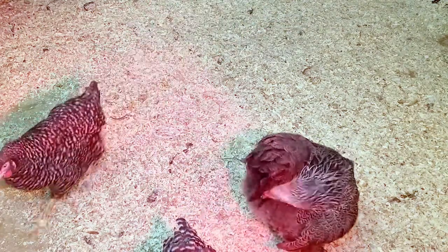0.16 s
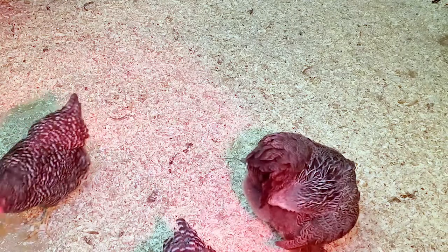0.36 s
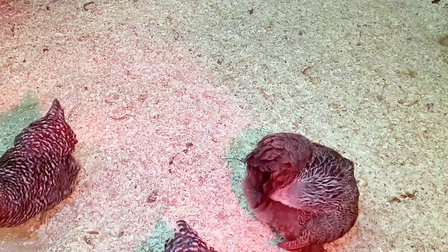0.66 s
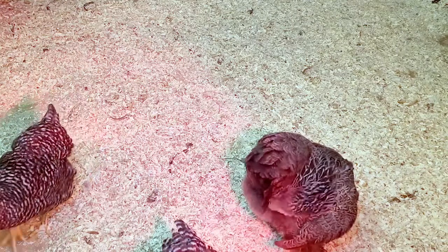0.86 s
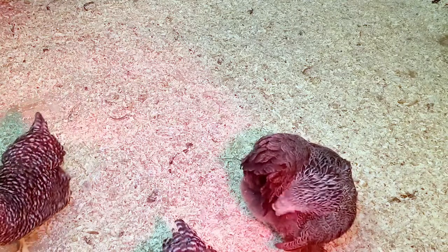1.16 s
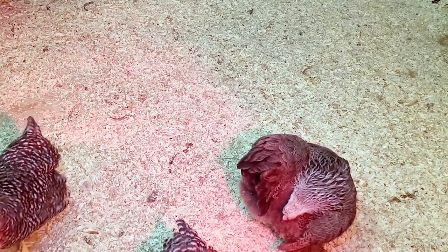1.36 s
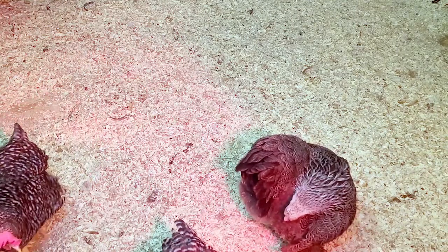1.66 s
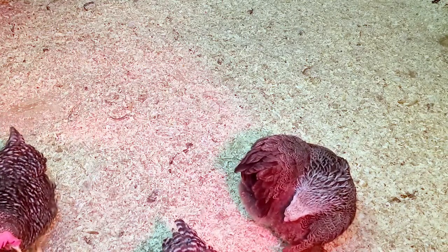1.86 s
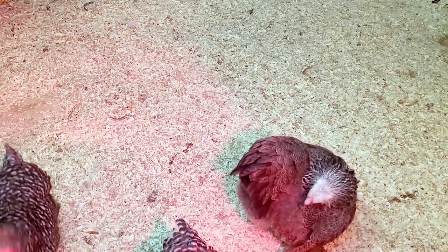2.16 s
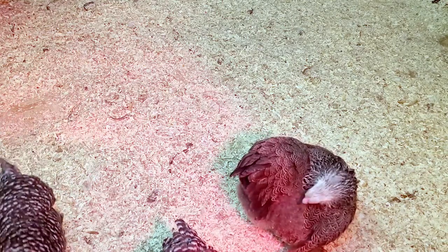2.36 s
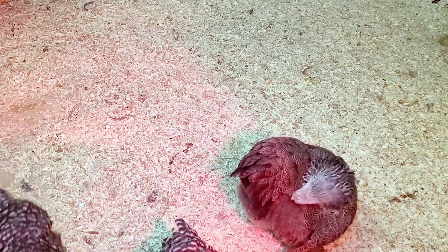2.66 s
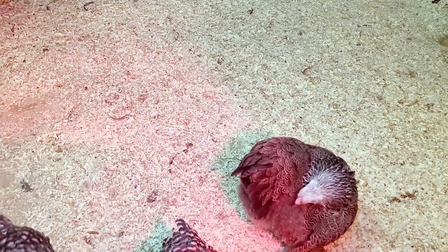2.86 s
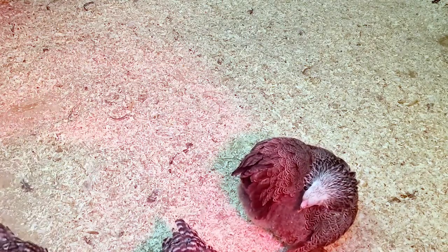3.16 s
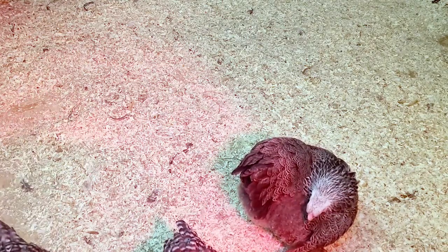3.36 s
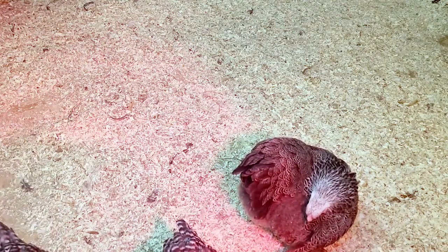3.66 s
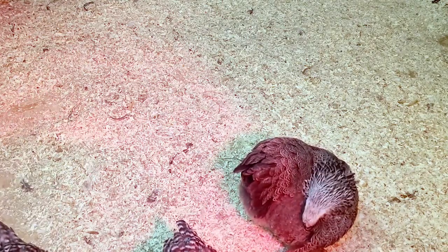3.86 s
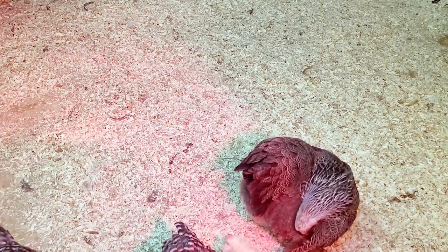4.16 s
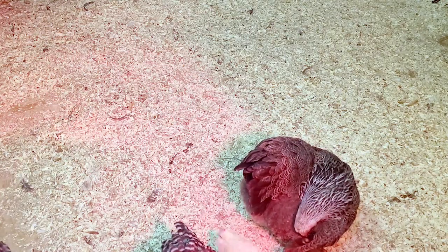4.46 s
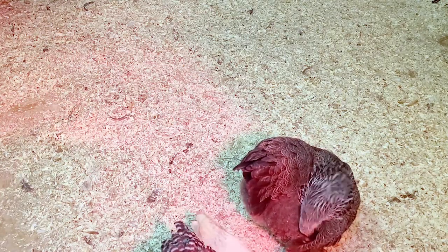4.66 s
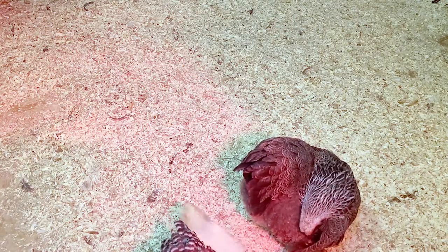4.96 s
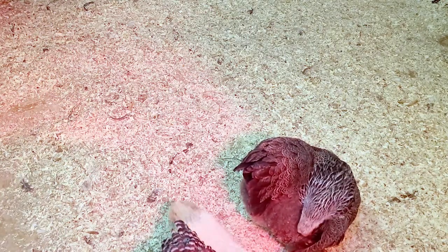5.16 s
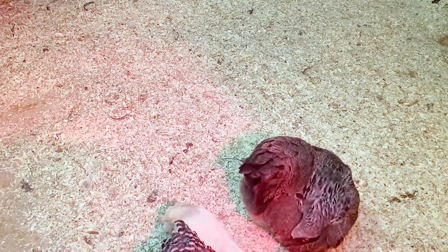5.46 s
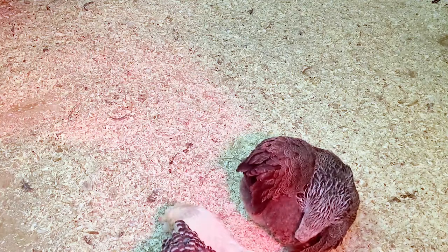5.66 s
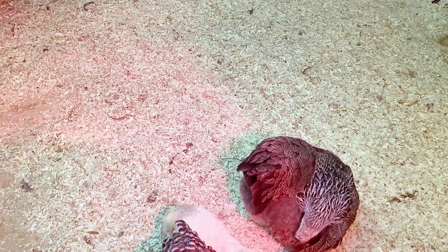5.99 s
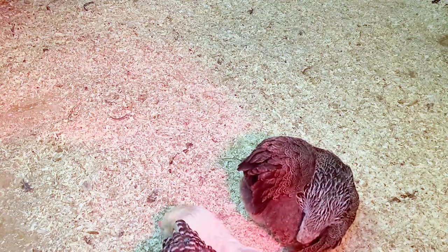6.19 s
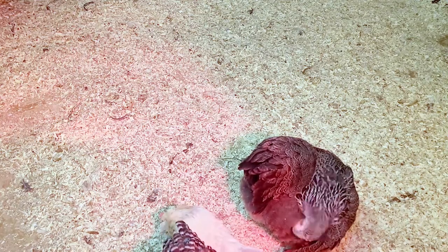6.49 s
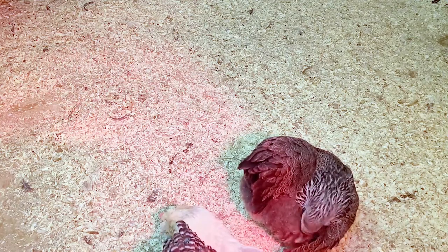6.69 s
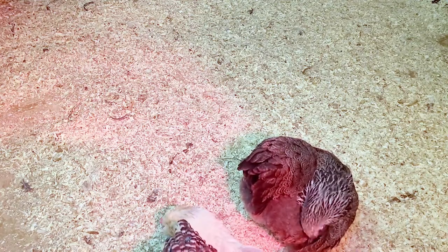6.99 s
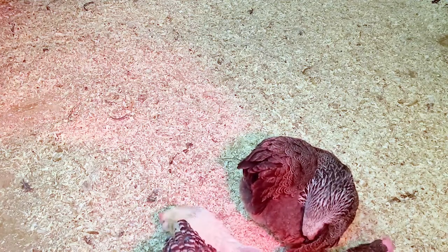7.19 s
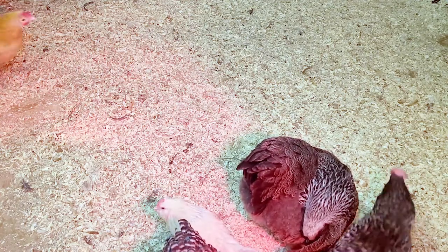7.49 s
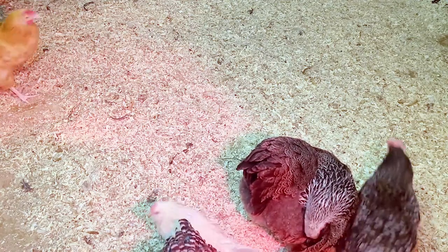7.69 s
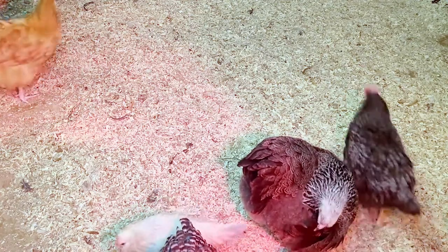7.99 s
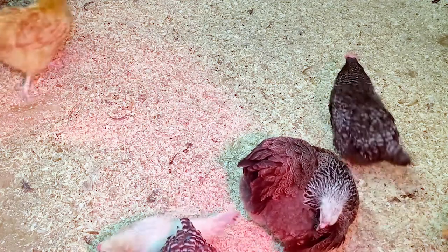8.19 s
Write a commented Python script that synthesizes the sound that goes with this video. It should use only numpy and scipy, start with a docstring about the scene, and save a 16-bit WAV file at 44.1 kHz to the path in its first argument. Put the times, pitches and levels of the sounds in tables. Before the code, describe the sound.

Young chickens cluck, peep and give short raspy squawks in a ringing indoor pen, scratching dry shavings over a low wavering hum.

```python
"""A soft cluck and a raspy squawk come first, over a low wavering hum, a rumble and a faint hiss.
Young chickens potter about on wood shavings in a bare, ringing indoor pen under a heat lamp.
They peep, cluck, squawk, peck, tread and scratch; one kicks the litter four times, close by.
Voices are shaken harmonic tones mixed with air noise; feet and beaks are short bursts of shaped noise.
One hard double tick is a few fading sine waves; the pen adds dense, fading reflections."""
import sys
import numpy as np
from scipy import signal
from scipy.fft import rfft, irfft
from scipy.io import wavfile

SR = 44100
rng = np.random.default_rng(int(sys.argv[2]) if len(sys.argv) > 2 else 0)


def to_wav(sig):
    """Store sig (one row per channel, or 1-D mono) as 16-bit WAV at the path in sys.argv[1].

    Samples outside -1..1 are clipped; the rate is SR.
    """
    pcm = np.clip(np.atleast_2d(sig), -1, 1) * 32767
    pcm = np.round(pcm).astype(np.int16)
    wavfile.write(sys.argv[1], SR, pcm.T)  # frames by channels


N = 367794

# Levels of single sounds in the tables are those before the pen's mix.
# colour of dry shavings sliding on each other: (pitch_hz, level_db)
LITTER = [(250, 0), (600, -31), (1000, -16), (1400, -10.5), (1900, 0), (2400, -1), (3100, 0), (4200, -1.5),
          (6000, 2), (9000, -2), (12000, 6.5), (14000, -1.5), (16000, -15)]
EDGE_HZ = 15900  # top of the whole sound's band


def gain_of(db):
    """Turns decibels into a factor of amplitude."""
    return 10 ** (np.asarray(db) / 20)


def evened(x):
    """Scales a signal to an average (RMS) strength of 1."""
    return x / np.sqrt(np.mean(x ** 2) + 1e-20)


def read(points, hz):
    """Reads a curve of (pitch_hz, value) points, with pitch spaced by ratio as in hearing."""
    point_hz, value = np.transpose(points)
    return np.interp(np.log(hz + 1), np.log(point_hz + 1), value)


def add(mix, start_s, sound):
    """Adds a sound to the mix at its start time, cut off at the end of the mix."""
    part = mix[max(round(start_s * SR), 0):][:len(sound)]
    part += sound[:len(part)]


def over_time(points, t):
    """Reads a curve of (time_s, value) points along straight lines."""
    return np.interp(t, *np.transpose(points))


def coloured(x, spectrum, tilt_db=0):
    """Multiplies x by a spectrum, tilted by so many dB an octave around 3000 Hz."""
    hz = np.fft.rfftfreq(x.shape[-1], 1 / SR)
    octaves = np.log2(np.maximum(hz, 800) / 3000)  # the tilt goes no further below 800 Hz
    return irfft(rfft(x) * gain_of(read(spectrum, hz) + tilt_db * octaves), x.shape[-1])


def wander(count, hz):
    """Smooth chance movement, of average strength 1, mostly slower than the given rate."""
    smoother = signal.butter(2, hz, fs=SR, output="sos")
    noise = rng.standard_normal(count + 2000)  # the first 2000 let the filter settle
    return evened(signal.sosfilt(smoother, noise)[-count:])


def crackle(count, per_s, spread_db):
    """Countless tiny slips of uneven size at chance moments."""
    size = gain_of(spread_db * np.minimum(rng.exponential(1, count), 4))
    return size * rng.standard_normal(count) * (rng.random(count) < per_s / SR)


def paired(two):
    """Blends two unrelated signals into a diffuse field: more alike in the bass than in the treble."""
    # (pitch_hz, left_right_likeness from -1 to 1)
    likeness = [(60, 0.52), (125, 0.9), (250, 0.83), (500, 0.24), (1000, -0.37), (2000, -0.032),
                (16000, 0.072)]
    a, b = rfft(two)
    same = np.clip(read(likeness, np.fft.rfftfreq(two.shape[1], 1 / SR)), -1, 1)
    mid = a * np.sqrt((1 + same) / 2)
    side = b * np.sqrt((1 - same) / 2)
    return irfft(np.array([mid + side, mid - side]), two.shape[1])


def lamp_hum():
    """A low tone whose pitch drifts and whose strength and phase waver by chance."""
    # slow level of the hum: (time_s, level_db)
    hum_level = [(0.0, -43.5), (2.46, -44), (2.49, -38), (2.62, -52), (2.9, -39), (2.97, -56), (3.02, -44),
                 (5.2, -42.5), (5.6, -47), (5.78, -37.5), (6.13, -48), (6.2, -40.5), (6.3, -48),
                 (6.88, -44.5), (8.06, -48.5), (8.15, -36), (8.22, -48), (8.34, -41)]
    base_hz, drift = 58.27, 0.0082  # drift is a share of the pitch
    waver_depth, waver_hz = 0.29, 6.5
    turns = np.cumsum(base_hz * (1 + drift * wander(N, hz=4.5))) / SR
    # the real part changes the strength, the imaginary part mostly the phase
    waver = 1 + waver_depth * (wander(N, waver_hz) + 1j * wander(N, waver_hz))
    tone = evened((waver * np.exp(2j * np.pi * turns)).real)
    return gain_of(over_time(hum_level, np.arange(N) / SR)) * tone


def building_rumble():
    """Steady wide noise, strongest in the deep bass."""
    # colour of the rumble: (pitch_hz, relative level_db_per_hz)
    rumble_colour = [(15, -55), (30, -18), (45, -5.5), (58, -5.5), (70, -0.5), (80, -1.5), (100, -14),
                     (128, -6), (155, -17.5), (250, -19.5), (330, -25.5), (450, -35), (650, -48),
                     (1500, -59)]
    return gain_of(-49.5) * evened(coloured(paired(rng.standard_normal((2, N))), rumble_colour))


def faint_hiss():
    """Steady wide noise, mostly in the middle and treble."""
    # colour of the hiss: (pitch_hz, relative level_db_per_hz)
    hiss_colour = [(300, -52), (600, -12), (1100, -7.5), (2000, -13), (3500, -62), (5500, -18), (8000, -8),
                   (10000, -8), (12000, 5), (14500, -2), (16000, -12)]
    return gain_of(-65.5) * evened(coloured(paired(rng.standard_normal((2, N))), hiss_colour))


def stirring(per_s=900, spread_db=5.0, bright_db=8):
    """Single chips tick here and there under the flock: sparse slips with the litter's colour."""
    # level of the flock's fine rustle: (time_s, level_db)
    rustle_level = [(0, -93), (.55, -70), (.8, -69.5), (1.5, -58.5), (1.7, -77), (2.15, -92), (2.4, -64.5),
                    (3.05, -72.5), (3.5, -68), (4.9, -66), (5.35, -70), (6.6, -67), (7.25, -63), (7.7, -61),
                    (8.1, -68), (8.34, -79)]
    ticks = evened(coloured(crackle(N, per_s, spread_db), LITTER, bright_db))
    return gain_of(over_time(rustle_level, np.arange(N) / SR)) * ticks


def treads(swell_s=0.0041, skirt_db=-17):
    """Soft pushes of a bird's weight on the bedding: fading noise around one pitch."""
    # dull treads and wing pushes: (start_s, fade_s, level_db, centre_hz)
    pushes = [(0.651, 0.011, -51.5, 1010), (0.711, 0.011, -49.5, 350), (0.778, 0.015, -55, 298),
              (1.459, 0.018, -53, 282), (2.85, 0.042, -58.5, 370), (3.62, 0.31, -77, 446),
              (4.115, 0.029, -57, 650), (4.81, 0.038, -58.5, 500), (5.16, 0.075, -57.5, 370),
              (7.389, 0.21, -65, 800), (7.49, 0.11, -59.5, 700), (7.9, 0.032, -58.5, 465)]
    out = np.zeros(N)
    t = np.arange(SR // 2) / SR
    for start_s, fade_s, level_db, hz in pushes:
        hump = [(hz / 8, -50), (hz / 8.5, skirt_db), (hz, 0), (hz * 2.94, skirt_db), (hz * 12, -60)]
        force = np.minimum(t / swell_s, 1) * np.exp(-np.maximum(t - swell_s, 0) / fade_s)
        noise = evened(coloured(rng.standard_normal(len(t)), hump))
        add(out, start_s, gain_of(level_db) * force * noise)
    return out


def chips(count, bright_db):
    """One handful of shavings, with resonances of its own, catching and slipping."""
    hz = np.geomspace(500, 16000, 60)
    own_colour = np.column_stack([hz, read(LITTER, hz) + 3.6 * rng.standard_normal(len(hz))])
    catching = gain_of(4 * wander(count, 70))
    slips = crackle(count, per_s=2800, spread_db=2.5) * catching
    less_bass = [(100, -25), (500, 0), (16000, 0)]
    return coloured(coloured(slips, own_colour, bright_db), less_bass)


def scratches():
    """A claw gathers speed through the shavings, then the chips settle; speed sets the loudness."""
    # feet raking the litter: (start_s, swell_s, fade_s, level_db, brightness_db_per_octave)
    rakes = [(0.63, 0.0019, 0.03, -43.5, 0.5), (.965, 0.011, 0.038, -70, -8),
             (1.054, 0.004, 0.086, -64.5, -1), (1.26, 0.014, 0.66, -69.5, -12),
             (1.439, 0.0078, 0.0097, -55, -6), (1.9, 0.035, 0.035, -60, 2.5),
             (2.179, 0.0053, .05, -68.5, -16.5), (2.304, 0.013, 0.03, -63.5, -13),
             (2.426, 0.015, 0.04, -67, -14), (2.84, 0.014, 0.021, -49, 10),
             (3.077, 0.0043, 0.024, -64.5, -4.5), (3.386, 0.0069, 0.029, -59, -11.5),
             (3.99, 0.018, 0.062, -73, 12), (4.103, .005, 0.068, -53.5, -10.5),
             (4.374, 0.0068, 0.026, -56.5, 11), (4.466, 0.0021, 0.079, -58.5, -10),
             (4.789, 0.0092, 0.4, -63.5, -2), (4.92, 0.012, 0.18, -59, -15), (5.11, 0.047, 0.043, -46, -5),
             (5.393, 0.011, 0.069, -49, -4), (5.434, 0.0058, 0.04, -35.5, -3),
             (5.615, 0.054, 0.036, -31.5, 0), (5.809, 0.0063, 0.037, -32.5, -0.5),
             (6.058, 0.026, 0.049, -36.5, -2.5), (6.098, 0.02, 0.023, -32.5, -0.5),
             (6.318, 0.0057, 0.013, -50.5, -6), (6.399, 0.003, 0.0068, -36.5, 0),
             (6.47, 0.013, 0.037, -46.5, -3), (7.019, 0.0059, 0.061, -61.5, -8),
             (7.371, 0.0017, 0.075, -56.5, -8), (7.482, 0.017, 0.13, -58.5, 2), (7.57, 0.03, 0.27, -54, 24),
             (7.77, 0.046, 0.19, -56.5, 8), (7.939, 0.012, 0.018, -51.5, 4),
             (8.147, 0.0055, 0.031, -64.5, -13.5), (8.171, 0.023, 0.19, -54, 9)]
    out = np.zeros(N)
    t = np.arange(16384) / SR
    for start_s, swell_s, fade_s, level_db, bright_db in rakes:
        gather = np.minimum(t / swell_s, 1) ** 0.69
        settle = np.exp(-(np.maximum(t - swell_s, 0) / fade_s) ** 1.13)
        speed = gather * settle
        rustle = speed * sum(chips(len(t), bright_db) for _ in range(3))
        # a short scratch keeps no more energy than its speed curve holds
        add(out, start_s, gain_of(level_db) * evened(rustle) * np.sqrt(np.mean(speed ** 2)))
    return out


def pecks():
    """Each tap is a snap of litter-coloured noise, fading within a few milliseconds."""
    # beak taps and snapping chips: (start_s, level_db, brightness_db_per_octave)
    taps = [(.638, -39.5, 6), (1.138, -56, 8), (1.474, -51, -1), (2.321, -50, 9), (2.811, -44.5, 25),
            (3.169, -57, 8), (4.106, -46.5, -7), (4.266, -50, 6), (4.938, -53.5, -3), (5.989, -46, -3.5),
            (7.24, -53, 15), (7.778, -44.5, 15), (7.958, -45, 23)]
    out = np.zeros(N)
    t = np.arange(2048) / SR
    for start_s, level_db, bright_db in taps:
        snap = np.exp(-t / .0035)
        noise = evened(coloured(rng.standard_normal(len(t)), LITTER, bright_db))
        add(out, start_s, gain_of(level_db) * snap * noise)
    return out


def hard_peck():
    """A beak hits something hard and rebounds: a double tick that rings briefly and very high."""
    # the two hits: (start_s, level_db)
    hits = [(4.4632, -28), (4.4647, -31.5)]
    # what rings: (pitch_hz, level_db, time_to_fade_60_db_s)
    modes = [(2350, -21, 0.033), (12000, -2.5, .006), (13400, 0, 0.0035), (15010, -3, .006)]
    out = np.zeros(N)
    t = np.arange(2048) / SR
    ring = sum(gain_of(db - 60 * t / t60) * np.sin(2 * np.pi * hz * t) for hz, db, t60 in modes)
    for start_s, level_db in hits:
        add(out, start_s, gain_of(level_db) * ring)
    return out


def syrinx(t, hz, rough, bright_db, half_tones=1.28, overtone_db=-7, slope_db=-4):
    """A high harmonic tone; strain shakes its pitch, makes cycles alternate and lets air through."""
    # a chick's throat and beak: (pitch_hz, level_db)
    throat = [(500, -26), (1000, 4.5), (1400, -2), (1950, -3), (2500, -5.5), (3000, 0), (3400, 2),
              (3700, 1), (4350, 1), (5000, 2), (5600, -1.5), (6400, -4), (7800, 2), (9500, -9), (11700, 1),
              (16000, -23)]
    # hoarse rush of air: (pitch_hz, level_db)
    rasp = [(700, -31), (1200, -16.5), (1600, 2), (2000, 4.5), (2450, 6.5), (3000, -3), (3600, -5.5),
            (4300, -28), (5500, -16), (8000, -8), (12000, -16), (16000, -19)]
    shake = (.028 + .065 * rough) * wander(len(t), 300)
    phase = 2 * np.pi * np.cumsum(hz * (1 + shake)) / SR
    k = np.arange(2, 21)[:, None] / 2  # 1, 1.5, 2 ... 10 times the pitch
    harmonic_db = overtone_db * (k >= 2) + (slope_db + bright_db) * np.log2(k)
    # tones halfway between harmonics make every other cycle differ
    kind = np.where(k % 1 == 0, 1, half_tones * rough / np.sqrt(k))
    weight = kind * gain_of(harmonic_db) * (k * hz < EDGE_HZ)
    buzz = (weight * np.sin(k * phase)).sum(0) / np.sqrt((weight ** 2).sum(0))
    tone = evened(coloured(buzz, throat))
    air = evened(coloured(rng.standard_normal(len(t)), rasp, np.mean(bright_db)))
    air_share = .4 * np.clip(rough, 0, 1)
    rattle = gain_of((1.5 + 3.5 * rough) * wander(len(t), 200))
    return evened(rattle * (np.sqrt(1 - air_share) * tone + np.sqrt(air_share) * air))


def beak(x, hz, lift_db=6.5, half_width=0.078):
    """The open beak lifts one band of the voice; half_width is a share of the band's pitch."""
    offset = (np.fft.rfftfreq(len(x), 1 / SR) / hz - 1) / half_width
    return evened(irfft(rfft(x) * gain_of(lift_db / (1 + offset ** 2)), len(x)))


def peeps():
    """Short, thin glides of the voice with hardly any roughness."""
    # (start_s, length_s, level_db, first_pitch_hz, last_pitch_hz, brightness_db_per_octave)
    glides = [(0.915, 0.11, -73, 3130, 3130, -5), (1.132, 0.033, -68.5, 3160, 3080, -14),
              (1.208, 0.038, -61, 2820, 2390, -5), (1.256, 0.046, -54.5, 2953, 2683, 6.5),
              (1.317, 0.12, -66.5, 2670, 2466, -18), (3.33, 0.055, -69, 2494, 2595, -13),
              (3.399, 0.051, -60.5, 2707, 2950, 6), (3.45, 0.1, -69, 2940, 2756, -21),
              (3.48, 0.11, -73, 2070, 1810, -12), (3.93, 0.0067, -41.5, 3570, 3680, 13.5),
              (3.981, 0.043, -57, 2433, 1966, 1), (3.992, 0.0082, -42, 3830, 4110, 10),
              (4.178, 0.019, -64, 2280, 1960, -4), (6.36, 0.054, -58.5, 3090, 2700, -26),
              (6.405, 0.021, -45.5, 2620, 2370, 5.5), (6.462, 0.043, -53, 2150, 2336, 4),
              (7.067, 0.038, -65, 3090, 3006, -21)]
    out = np.zeros(N)
    for start_s, length_s, level_db, first_hz, last_hz, bright_db in glides:
        t = np.arange(0, length_s, 1 / SR)
        tone = syrinx(t, np.linspace(first_hz, last_hz, len(t)), .05, bright_db)
        add(out, start_s, gain_of(level_db) * tone * signal.windows.tukey(len(t), .7))
    return out


def clucks():
    """A soft note glides up or down; it swells, holds, and dulls as the beak closes."""
    # (start_s, length_s, level_db, first_pitch_hz, last_pitch_hz, roughness 0-1,
    #  brightness_db_per_octave, beak_resonance_hz)
    notes = [(0.0, 0.062, -58, 1342, 1207, 0.65, 2.5, 2600),
             (1.155, 0.11, -58.5, 1326, 1216, 0.42, 1.5, 2540),
             (1.774, 0.073, -57, 1345, 1670, 0.1, 5, 4940),
             (1.84, 0.12, -63.5, 1631, 1728, 0.68, -20, 1830),
             (2.513, .105, -60.5, 1319, 1487, 0.13, -1.5, 2500),
             (3.309, 0.061, -59, 1226, 1257, 0.15, 5.5, 2480),
             (3.879, 0.095, -58.5, 1246, 1098, 0.54, 1.5, 3260),
             (4.046, 0.068, -59.5, 1440, 1306, 0.3, 0, 2680),
             (4.257, 0.034, -52.5, 2006, 2073, 0.14, 2.5, 2200),
             (4.581, 0.047, -52, 1388, 1463, 0.2, 7.5, 1430),
             (4.787, 0.083, -57.5, 1090, 970, 0.5, -3, 2120),
             (5.002, 0.14, -61, 1596, 1490, 0.19, 6.5, 1550),
             (5.611, 0.021, -61.5, 1060, 1016, .5, -10, 1000),
             (5.796, 0.034, -61.5, 1005, 980, 0.54, -10, 1020),
             (6.629, 0.075, -51, 1484, 1574, 0.31, 6.5, 3050),
             (6.846, 0.087, -66, 1495, 1570, 0, 4.5, 1550), (6.949, 0.13, -66.5, 999, 883, 0.66, 1, 1900),
             (7.162, 0.088, -58.5, 1290, 1463, 0.01, 5, 1410),
             (7.554, 0.21, -68.5, 921, 820, 0.37, -11, 840)]
    swell_share, onset_db = 0.21, -1  # part of the length spent swelling; the level it swells from
    dulling_db = 5  # brightness lost from start to end, per octave
    out = np.zeros(N)
    for start_s, length_s, level_db, first_hz, last_hz, rough, bright_db, beak_hz in notes:
        t = np.arange(0, length_s, 1 / SR)
        part = t / length_s
        swell_db = np.interp(part, [0, swell_share], [onset_db, 0])
        hz = first_hz + (last_hz - first_hz) * part
        tone = beak(syrinx(t, hz, rough, bright_db + dulling_db * (.5 - part)), beak_hz)
        add(out, start_s, gain_of(level_db + swell_db) * tone * signal.windows.tukey(len(t), .15))
    return out


def squawks():
    """The pitch leaps up and holds as the level climbs; at the top the voice turns raspier and sinks."""
    # (start_s, rise_s, fall_s, level_db, top_pitch_hz, roughness (about 0-1),
    #  brightness_db_per_octave, beak_resonance_hz)
    calls = [(.075, 0.034, .07, -55, 2072, 1.18, -7.5, 3200), (.358, 0.058, .08, -46, 2010, 0.79, -1, 3030),
             (3.565, 0.041, .07, -43, 1842, 0.54, 2.5, 3530),
             (3.78, 0.029, .06, -51.5, 2008, 0.37, 1.5, 3250),
             (4.605, .045, .08, -45, 1941, 0.7, 4.5, 2970),
             (6.682, .05, .135, -43.5, 2524, 0.24, 2.5, 4900),
             (7.579, 0.027, .085, -60, 2117, 0.77, -9, 2870),
             (7.805, 0.039, .085, -60, 2160, 0.8, -0.5, 3220),
             (8.225, .05, .08, -41.5, 2004, 0.73, 2, 3900)]
    # shares of the roughness: at the start, on reaching pitch, at the top, at the end
    rough_shares = (0.152, .35, .75, 1.25)
    pitch_shares = [.7, 1, 1, .8]  # shares of the top pitch at the same four moments
    dulling_db = 5  # brightness lost from start to end as the beak closes, per octave
    out = np.zeros(N)
    for start_s, rise_s, fall_s, level_db, top_hz, rough, bright_db, beak_hz in calls:
        length_s = rise_s + fall_s
        t = np.arange(0, length_s, 1 / SR)
        stages = [0, rise_s * .5, rise_s, length_s]  # the pitch is up halfway through the rise
        hz = top_hz * np.interp(t, stages, pitch_shares)
        swell_db = np.interp(t, [0, rise_s, length_s], [-14, 0, -11])
        strain = np.clip(rough * np.interp(t, stages, rough_shares), 0, 1)
        tone = beak(syrinx(t, hz, strain, bright_db + dulling_db * (.5 - t / length_s)), beak_hz)
        add(out, start_s, gain_of(level_db + swell_db) * tone * signal.windows.tukey(len(t), .12))
    return out


def pen(x, direct_db, wet_db, left_lag):
    """The straight path may reach one side first; dense reflections from near walls die by band."""
    # how long the pen rings: (pitch_hz, time_to_fade_60_db_s)
    ringing = [(200, 0.75), (800, 0.39), (2000, 0.5), (5500, 0.33), (10000, 0.27), (16000, 0.11)]
    echoes = rng.standard_normal((2, SR)) * (rng.random((2, SR)) < 5000 / SR)  # about 5000 a second
    hz, t, bands = signal.stft(paired(echoes), SR, nperseg=256)
    fade = gain_of(-60 * t / read(ringing, hz)[:, None])
    tail = signal.istft(bands * fade, SR, nperseg=256)[1]
    # silent for 2 ms, then rising to full over the next 2 ms
    tail = tail * np.clip(np.arange(tail.shape[1]) / SR / 0.002 - 1, 0, 1)
    tail = tail / np.linalg.norm(tail, axis=1, keepdims=True)
    wet = signal.fftconvolve(x[None], tail, axes=1)[:, :N]
    direct = np.array([np.roll(x, left_lag), x])  # lag in samples; below zero the left is first
    return gain_of(direct_db) * direct + gain_of(wet_db) * wet


def scene(tick_right_db=-3):
    """Voices, feet and beaks sound in the pen, over the hum, rumble and hiss."""
    background = lamp_hum() + building_rumble() + faint_hiss()
    feet = pen(stirring() + treads() + scratches(), direct_db=-3.5, wet_db=-0.5, left_lag=10)
    beaks = pen(pecks(), direct_db=0, wet_db=0, left_lag=0)
    tick = pen(hard_peck(), direct_db=-4, wet_db=3.5, left_lag=-8)
    tick = tick * gain_of([[0], [tick_right_db]])  # close on the left
    chicks = pen(peeps(), direct_db=1, wet_db=0, left_lag=4)
    voices = pen(clucks() + squawks(), direct_db=-4, wet_db=-1.1, left_lag=-4)
    return background + feet + beaks + tick + chicks + voices


def record(dry):
    """Left and right each get their own colour; then a low-pass filter cuts the highest treble."""
    # (pitch_hz, left_minus_right_db)
    balance = [(60, -1.3), (250, 1), (600, 1.5), (2000, 1.5), (4000, 1.5), (8000, -2.5), (12000, -3),
               (16000, 21.5)]
    lean = gain_of(read(balance, np.fft.rfftfreq(N, 1 / SR)) / 2)
    sides = irfft(rfft(dry) * np.array([lean, 1 / lean]), N)
    low_pass = signal.firwin(511, EDGE_HZ, window=("kaiser", 9), fs=SR)
    return signal.oaconvolve(sides, low_pass[None], "same")


dry = scene()
out = record(dry)
to_wav(out)
```